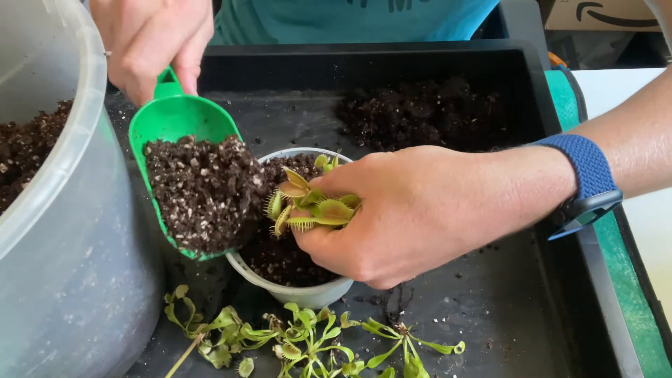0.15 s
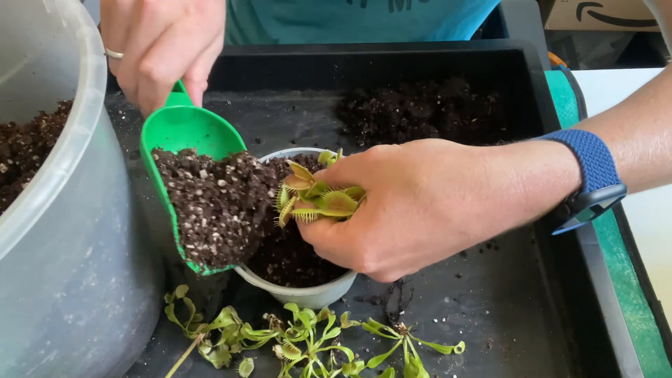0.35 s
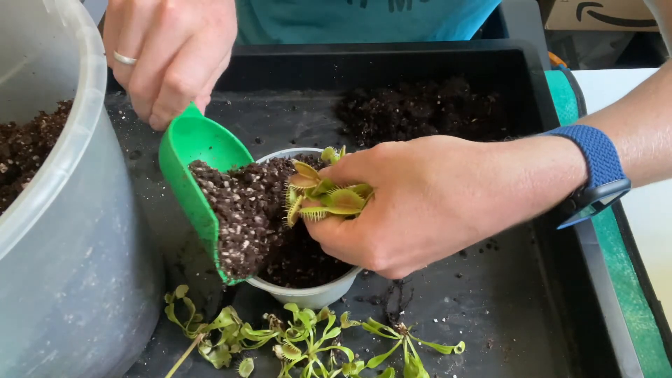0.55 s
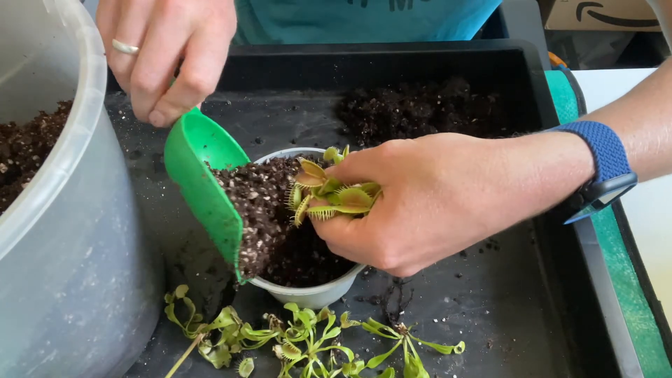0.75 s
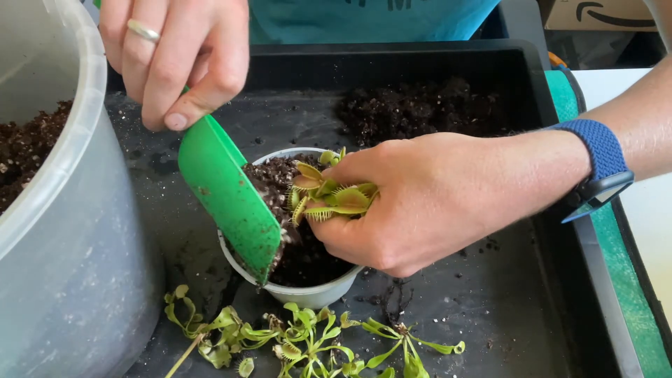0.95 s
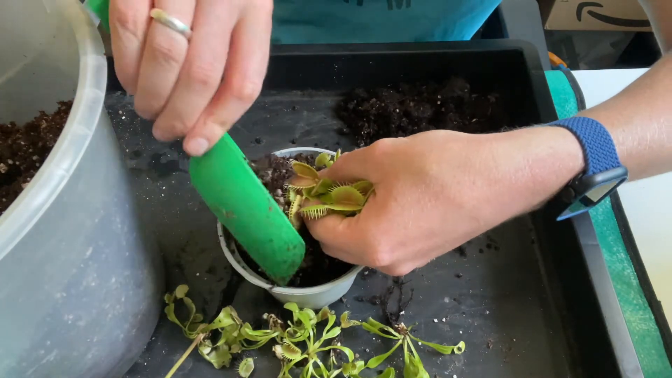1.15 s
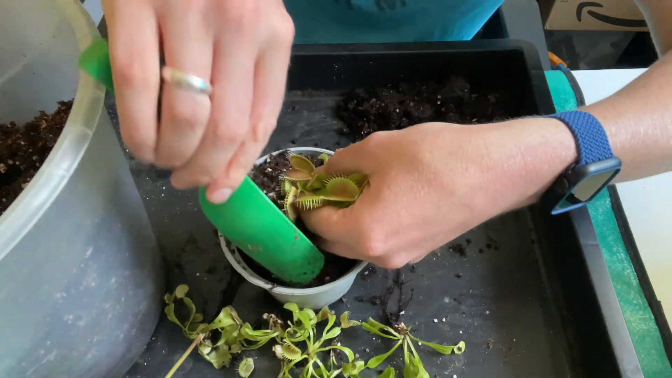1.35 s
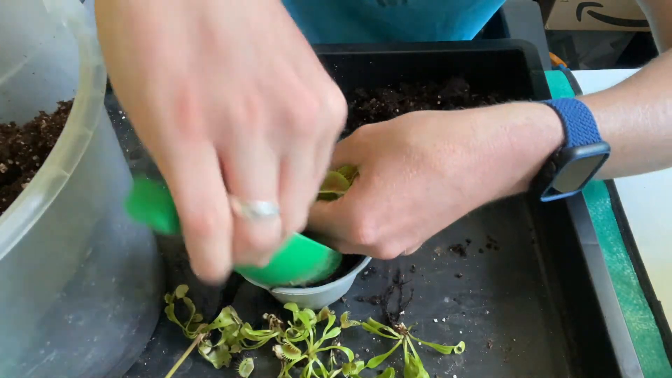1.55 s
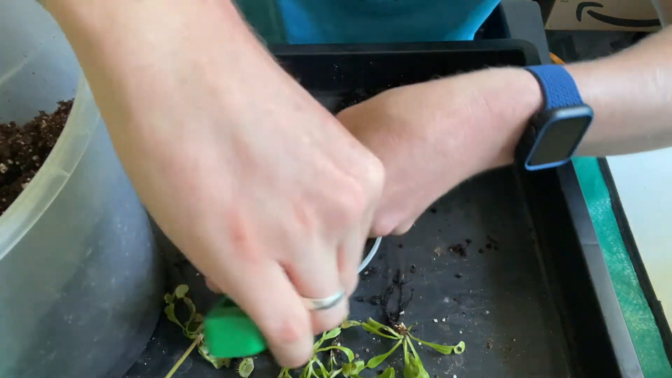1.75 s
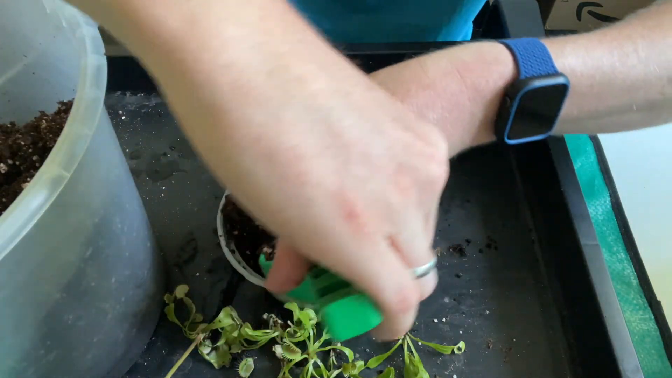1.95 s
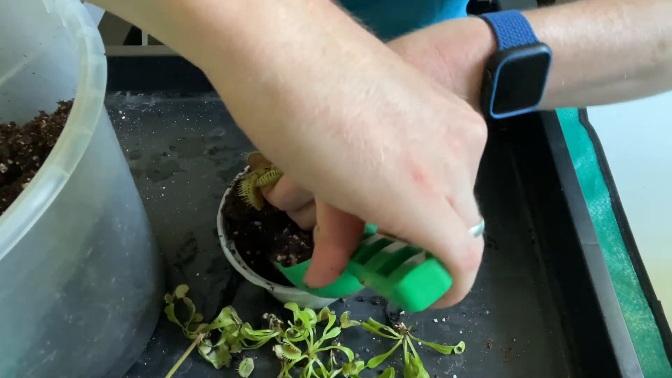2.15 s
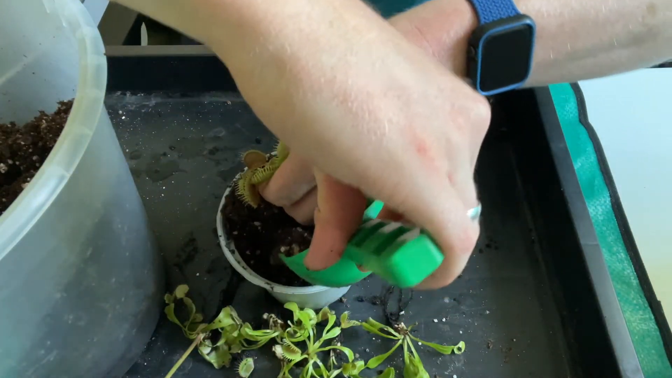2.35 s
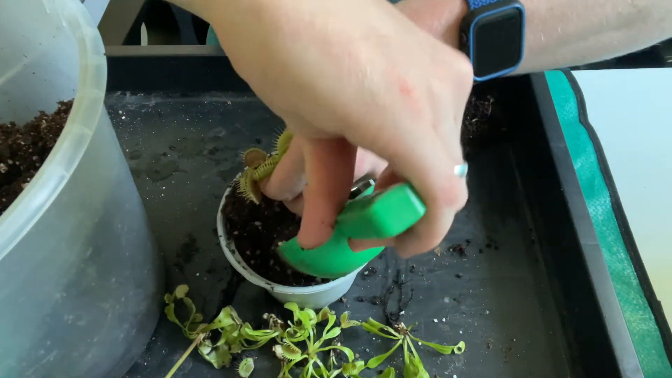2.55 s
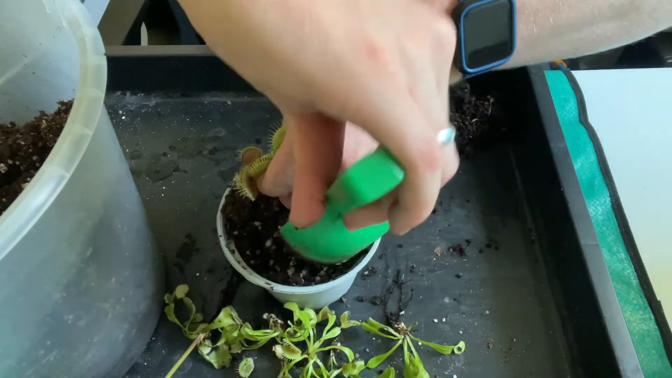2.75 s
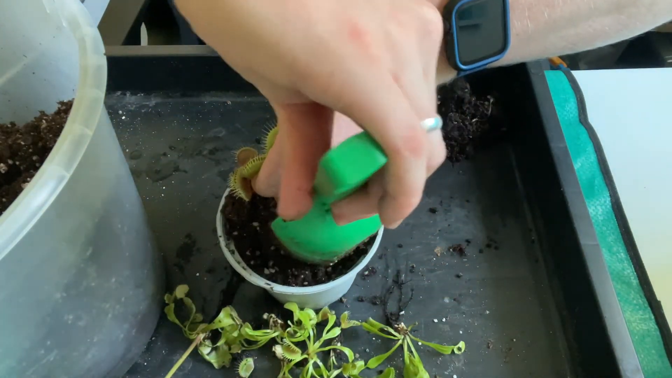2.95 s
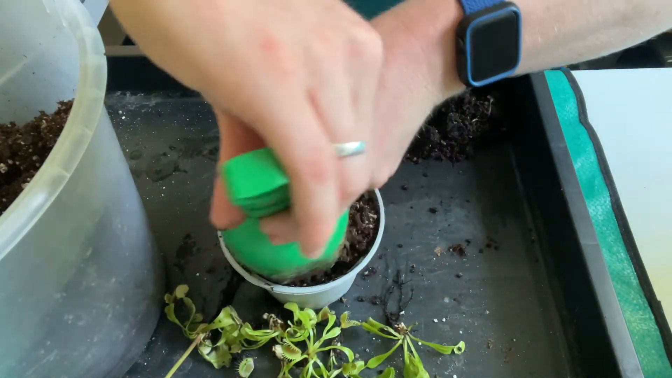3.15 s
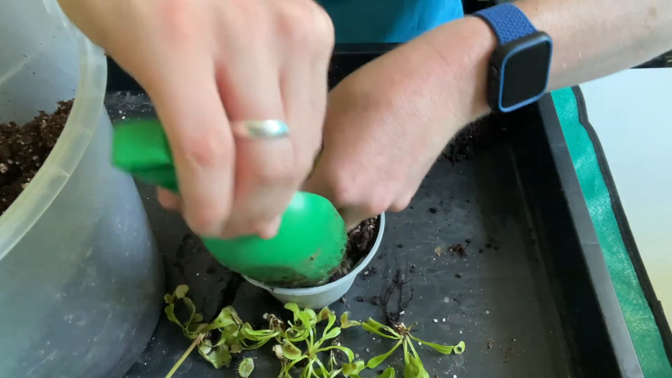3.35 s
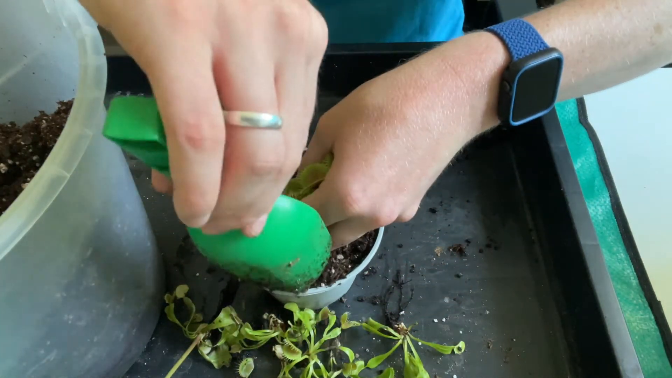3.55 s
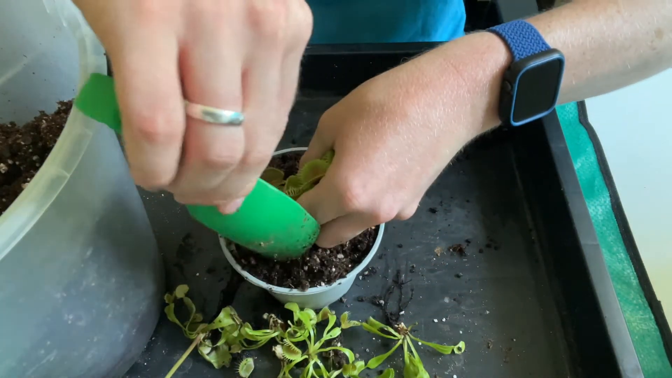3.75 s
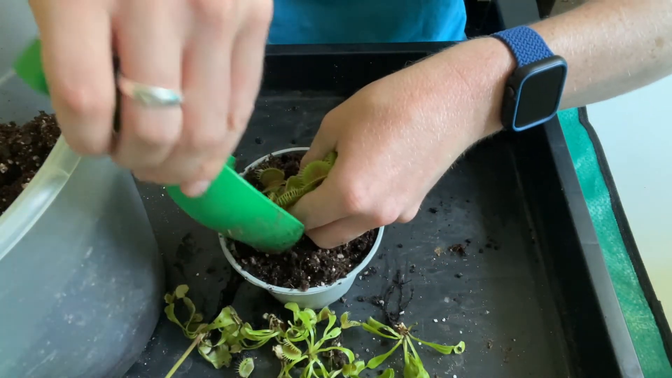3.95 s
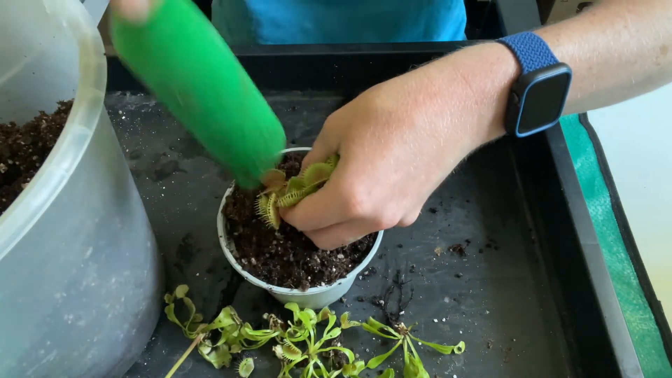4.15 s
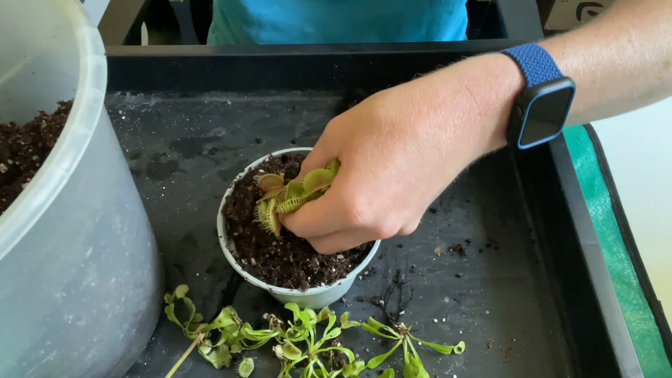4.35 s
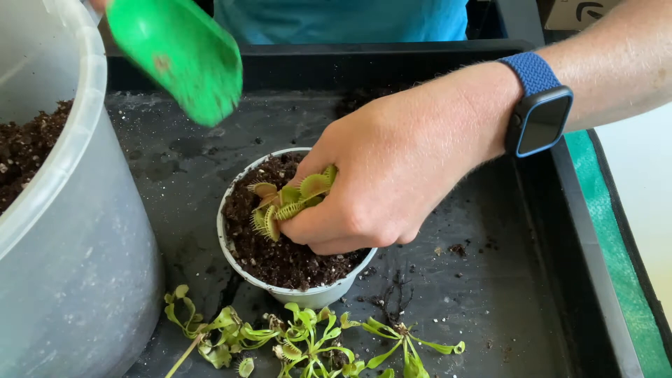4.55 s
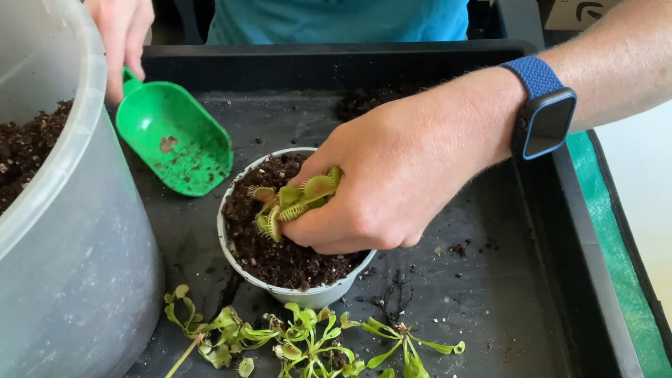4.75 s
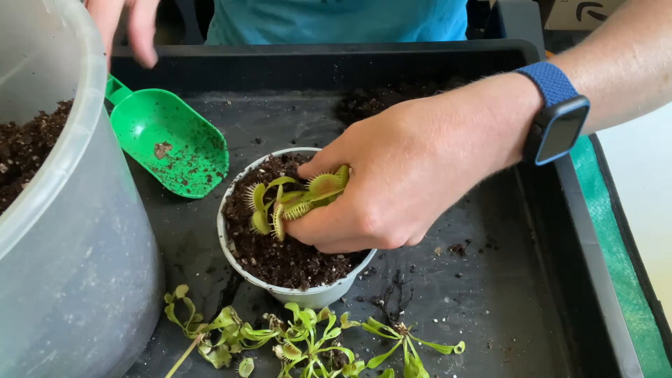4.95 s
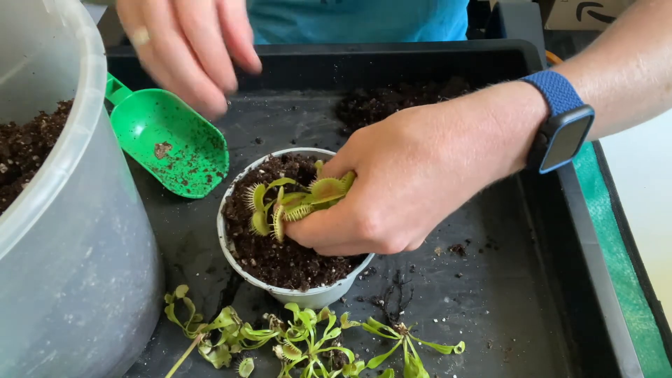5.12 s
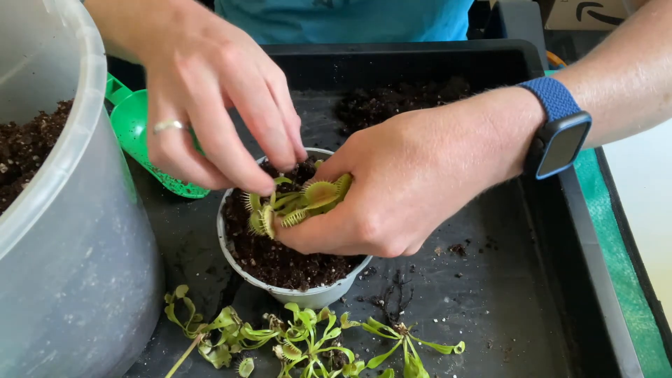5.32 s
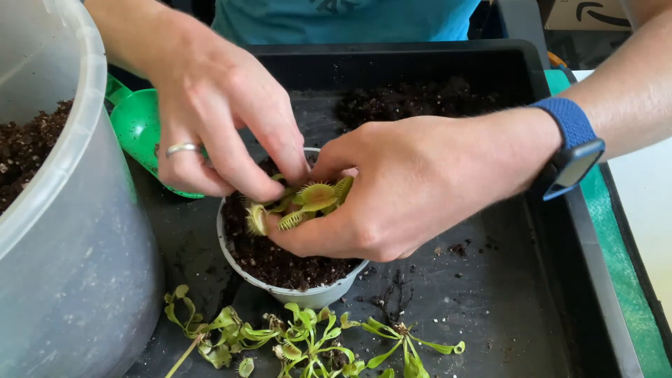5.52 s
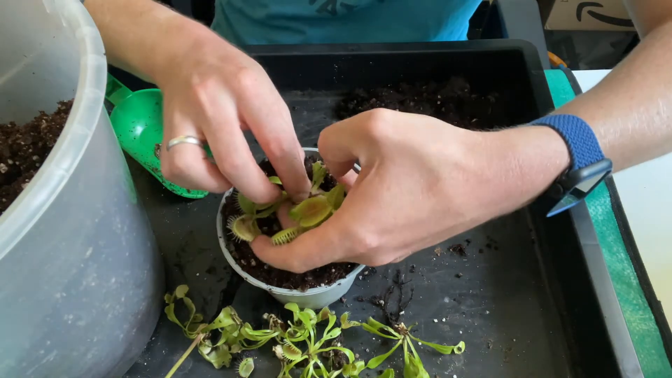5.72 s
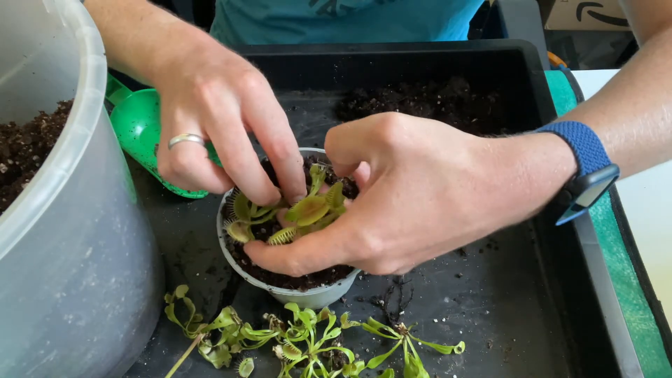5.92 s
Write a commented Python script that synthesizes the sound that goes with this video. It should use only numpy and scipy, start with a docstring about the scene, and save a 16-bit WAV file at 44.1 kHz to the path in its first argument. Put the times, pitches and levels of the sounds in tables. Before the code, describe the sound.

Close, dry hiss and crunch of soil being scooped and pressed, soft table thumps, a short lull, then two hard plastic knocks and faint rustling.

```python
"""Close to a phone, in a quiet room, gritty potting mix slides off a plastic scoop into a small pot.
The grit hisses, then crunches and snaps as the scoop presses it; each shove thumps through the table.
After a lull the scoop drops on a plastic tray, clacks and rocks there, and a few last grains stir.
The hiss and crunches are shaped noise, the thumps are ringing modes, the clacks are both.
The tub, the tray rim and the room answer briefly, over a faint room tone."""
import sys
import numpy as np
from scipy import signal
from scipy.fft import rfft, irfft, next_fast_len
from scipy.io import wavfile
from scipy.ndimage import uniform_filter1d, map_coordinates

SR = 44100
rng = np.random.default_rng(int(sys.argv[2]) if len(sys.argv) > 2 else 0)


def put_to_file(sound):
    """Save the sound as 16-bit audio at rate SR, in the file named by the first command-line argument."""
    columns = np.atleast_2d(sound).T  # one column per channel
    safe = np.clip(columns, -1, 1)
    whole_steps = np.round(safe * 32767)
    wavfile.write(sys.argv[1], SR, whole_steps.astype(np.int16))


N = 263786  # length in samples, about 6 s


def amp(db):
    """Gain of a level in dB."""
    return 10 ** (np.asarray(db) / 20)


def unit(x):
    """x at rms 1."""
    return x / np.sqrt(np.mean(x ** 2) + 1e-20)


def along(points, hz):
    """Values at hz from (f/Hz, value) points joined on a log frequency axis."""
    f, value = np.transpose(points)
    return np.interp(np.log(hz + 1), np.log(f + 1), value)


def filtered(x, response):
    """x times a complex response of frequency."""
    n = x.shape[-1]
    padded = next_fast_len(n + 4096)
    spectrum = rfft(x, padded) * response(np.fft.rfftfreq(padded, 1 / SR))
    return irfft(spectrum, padded)[..., :n]


def resonance(f, hz, width):
    """One causal resonance of peak gain 1, width in Hz."""
    return 1j * f * width / (hz * hz - f * f + 1j * f * width)


def ringing(modes, push, scatter_db):
    """Decaying modes (f/Hz, level/dB, t60/s), levels scattered at random, eased in over push seconds."""
    t = np.arange(SR // 3) / SR
    ring = np.zeros(len(t))
    for hz, db, t60 in modes:
        mode_db = db + scatter_db * rng.standard_normal()
        ring += amp(mode_db - 60 * t / t60) * np.sin(2 * np.pi * hz * t)
    return ring * (1 - np.exp(-t / max(push, 1e-4)))


# Sliding mix: t/s, flow level/dB, dull peat over the flow/dB, fine sand over the flow/dB, table rumble level/dB
SLIDE_COURSE = [(0.0, -50, -8.5, -25, -66), (0.25, -60, 0.5, -7, -51), (0.42, -59.5, -14, -2, -71),
                (0.7, -72.5, -14, -7.5, -63), (0.9, -70.5, 3, -7, -67), (1.06, -73, 0, 10, -43.5),
                (1.2, -66, 1.5, -1.5, -43.5), (1.53, -55.5, 0.5, 1, -53.5),
                (1.75, -55.5, -15.5, -0.5, -58.5), (2.1, -63, 5.5, -6, -58), (2.5, -62, -9, -3.5, -87),
                (3.1, -66, -7.5, 0.5, -64), (3.38, -55, -12.5, -7, -58.5), (3.71, -59, -5.5, 0, -64),
                (3.88, -75, 0.5, -4.5, -80), (4.66, -81, 10.5, -3, -60.5), (4.851, -50, 9.5, -19, -36),
                (5.01, -65, 10.5, -14, -46), (5.209, -76, 20.5, -5.5, -46), (5.48, -73.5, 1.5, -1, -70.5),
                (5.98, -85, 6, 8, -68)]
# Table top modes, also struck in thumps(): f/Hz, level/dB, t60/s
TABLE_MODES = [(89.5, -4, 0.24), (100.46, 2.5, 0.15), (152.9, 0, 0.19), (230, -1, 0.072),
               (321.5, -0.5, 0.08)]


def slide():
    """The mix slides and trickles close by; the same motion rumbles in the table's three lowest modes."""
    t, *courses = np.transpose(SLIDE_COURSE)
    flow_db, peat_db, sand_db, rumble_db = [np.interp(np.arange(N) / SR, t, c) for c in courses]
    dull, grit, sand = grit_stream(spiky_db=4.0, clump_db=3.0)
    hiss = amp(flow_db) * (grit + amp(peat_db) * dull + amp(sand_db) * sand)

    def table(f):
        return sum(amp(db) * resonance(f, hz, 5 / t60) for hz, db, t60 in TABLE_MODES[:3])

    rumble = unit(filtered(rng.standard_normal(N), table))
    return hiss, amp(rumble_db) * rumble


# Resonances of the plastic scoop: f/Hz, width/Hz, level/dB
SCOOP_MODES = [(740, 190, -14), (1560, 600, -16), (2800, 85, -2), (3470, 340, -4), (4644, 400, -4),
               (6480, 170, 1.5), (8060, 770, -12.5)]
# Spectra of dull peat, grit and fine sand, also heard in ticks(): f/Hz, level/dB
PEAT_TONE = [(120, -40.5), (250, -5.5), (600, 0), (1100, -5), (1800, -18.5), (4000, -66.5)]
GRIT_TONE = [(500, -38), (1000, -7), (1500, 3), (3000, 1), (4500, -1.5), (6500, -11.5), (12000, -63)]
SAND_TONE = [(2500, -54), (4300, -6), (5500, -6.5), (8000, -5), (10500, -5.5), (13000, -6.5), (17000, -18)]
MIX_TONES = (PEAT_TONE, GRIT_TONE, SAND_TONE)


def grit_stream(spiky_db, clump_db):
    """Dull, gritty and sandy parts (rms 1) of a dense stream of tiny unequal impacts that come in clumps."""
    clumps = map_coordinates(rng.standard_normal(N // 256 + 4), [np.arange(N) / 256])
    spikes = uniform_filter1d(rng.exponential(size=N) ** 2, size=24)
    shared = amp(clump_db * clumps + spiky_db * spikes)
    impacts = shared * rng.standard_normal((3, N))

    def shell(f):
        return 1.2 + sum(amp(db) * resonance(f, hz, width) for hz, width, db in SCOOP_MODES)

    return [unit(filtered(x, lambda f: shell(f) * amp(along(tone, f))))
            for x, tone in zip(impacts, MIX_TONES)]


def by_size(rule, hz):
    """Level in dB for a grain ringing at hz, from a rule (dB at 3 kHz, dB per octave)."""
    return rule[0] + rule[1] * np.log2(hz / 3000)


# Smaller grains ring higher and carry less dull and more bright sound: dB at 3 kHz, dB per octave
CRUNCH_DULL, CRUNCH_BRIGHT = (-10, -5), (-2, 3.8)
# Crunches and scrapes of grit under the scoop or fingers:
# centre t/s, relative level/dB, ring f/Hz, spread of the swell/s (at least 2 ms is played)
CRUNCH_EVENTS = [(0.037, -49, 3150, 0.023), (0.128, -47.5, 1960, 0.033), (0.2, -55.5, 610, 0.025),
                 (0.29, -57.5, 684, 0.016), (0.809, -49.5, 1554, .009), (0.9135, -52.5, 1770, 0.016),
                 (1.021, -44.5, 1587, 0.02095), (1.106, -42, 1500, 0.016), (1.2309, -35, 2130, 0.014),
                 (1.2875, -47.5, 3560, 0.019), (1.441, -46, 1080, 0.012), (1.493, -44.5, 3330, .017),
                 (1.599, -36.5, 3480, 0.012), (1.8313, -43.5, 3290, 0.014), (1.9016, -42, 850, 0.031),
                 (2.076, -48.5, 8600, 0.0157), (2.122, -46, 1370, 0.019), (2.1727, -44.5, 8200, 0.0097),
                 (2.2957, -51, 3880, .008), (2.388, -44, 6220, 0.0115), (2.4736, -45, 3970, 0.0085),
                 (2.5854, -49, 3660, 0.0058), (2.6308, -51.5, 8200, 0.0066), (2.828, -42, 3050, 0.011),
                 (2.94, -55, 1010, 0.026), (3.014, -51.5, 6200, 0.015), (3.3287, -41.5, 1760, 0.032),
                 (3.479, -30.5, 6760, 0.00492), (3.5424, -49, 910, 0.023), (3.607, -44, 1200, 0.019),
                 (3.7245, -50, 2670, 0.0099), (3.7866, -45.5, 6360, 0.0088), (3.931, -55.5, 1180, 0.015),
                 (4.724, -40.5, 1890, 0.023), (4.75, -32, 2190, 0.0056), (5.121, -42.5, 1340, 0.011),
                 (5.19, -54, 1430, 0.03), (5.338, -56.5, 1600, 0.0036), (5.4075, -61.5, 6718, 0.022),
                 (5.519, -55.5, 6740, 0.0072), (5.682, -68.5, 8000, .015), (5.8728, -67, 7493, 0.011),
                 (5.9345, -59, 1114, 0.021)]


def crunches():
    """A press crushes many grains: the burst swells and fades and rings one resonance of the scoop or pot."""
    out, t = np.zeros(N), np.arange(N) / SR
    dull, grit, sand = grit_stream(spiky_db=2.5, clump_db=1.0)
    for s, db, hz, spread in CRUNCH_EVENTS:
        dull_db, bright_db = by_size(CRUNCH_DULL, hz), by_size(CRUNCH_BRIGHT, hz)
        at = slice(max(round((s - .15) * SR), 0), round((s + .15) * SR))
        swell = np.exp(-.5 * ((t[at] - s) / max(spread, .002)) ** 2)
        ring = unit(filtered(rng.standard_normal(len(swell)), lambda f: resonance(f, hz, 0.16 * hz)))
        ring_db = -2.0 + bright_db * (hz > 5000)  # only high rings follow the grain size
        burst = grit[at] + amp(ring_db) * ring + amp(dull_db) * dull[at] + amp(bright_db) * sand[at]
        out[at] += amp(db - 5) * swell * burst
    return out


# Dull and bright sound by grain size: dB at 3 kHz, dB per octave
TICK_DULL, TICK_BRIGHT = (-9.5, -8.5), (-5, 7.3)
# Single grains that snap or hit the plastic: t/s, relative level/dB, ring f/Hz
TICK_EVENTS = [(0.081, -38.5, 1722), (0.1184, -34.5, 2100), (0.4628, -55, 8600), (0.608, -35.5, 3350),
               (0.9371, -36.5, 4750), (1.1012, -42.5, 1410), (1.1451, -40, 1090), (1.1597, -33.5, 1000),
               (1.2151, -27, 1720), (1.273, -37, 3720), (1.302, -41.5, 4000), (1.421, -33.5, 1510),
               (1.6242, -33.5, 3600), (1.657, -36, 1650), (1.6976, -38.5, 975), (1.815, -35.5, 2840),
               (1.8727, -40, 1490), (1.896, -30.5, 1000), (2.029, -39.5, 3480), (2.1949, -42.5, 7460),
               (2.4027, -35.5, 4350), (2.646, -27.5, 3540), (2.7633, -45.5, 4140), (3.115, -42.5, 2077),
               (3.142, -37, 4000), (3.1903, -36, 4450), (3.2374, -23.5, 3344), (3.312, -29.5, 3330),
               (3.3215, -30, 3330), (3.3443, -37, 7400), (3.391, -41.5, 7890), (3.4007, -37, 4570),
               (3.41, -35, 1660), (3.4488, -38, 2910), (3.4581, -33, 3720), (3.5755, -24.5, 1394),
               (3.5937, -23.5, 2470), (3.6395, -31, 1320), (3.6639, -42.5, 3020), (3.6842, -39, 6210),
               (4.186, -63.5, 8650), (5.3975, -50.5, 6417), (5.44, -57.5, 8420)]


def ticks():
    """One grain: a snap of a millisecond or two with a faint scatter of crumbs after it."""
    out, t = np.zeros(N + SR), np.arange(2048) / SR
    lead = 256  # samples of silence ahead, for the filters
    shape = np.pad(np.exp(-t / .0012) + .12 * np.exp(-t / .01), (lead, 0))
    for s, db, hz in TICK_EVENTS:
        dull_db, bright_db = by_size(TICK_DULL, hz), by_size(TICK_BRIGHT, hz)
        snap = shape * rng.standard_normal(len(shape))
        dull, grit, sand = [unit(filtered(snap, lambda f: amp(along(tone, f)))) for tone in MIX_TONES]
        ring = unit(filtered(snap, lambda f: resonance(f, hz, 0.14 * hz)))
        ring_db = bright_db * (hz > 5000)
        grain = grit + amp(ring_db) * ring + amp(dull_db) * dull + amp(bright_db) * sand
        out[round(s * SR) - lead:][:len(snap)] += amp(db - 21) * grain
    return out[:N]


# Scoop landing and rocking on the tray: t/s, relative level/dB, bright part/dB, scoop note f/Hz
KNOCK_EVENTS = [(4.6658, -25.5, -26, 2522), (4.6831, -19, -21, 1344), (4.7068, -24.5, -9, 600),
                (4.7563, 5, -23.5, 537), (4.776, -21.5, -21.5, 547), (4.8792, -35.5, -10, 800),
                (4.9113, -22, -5, 4800), (5.0367, -38.5, -30, 1420), (5.0558, -26.5, -24, 534),
                (5.1029, -23, -10.5, 1432), (5.1372, -17, -5.5, 1500), (5.1543, -27, -7.5, 1370),
                (5.1698, -24.5, -2.5, 1420), (5.2133, -45.5, 3, 737)]
# Plastic tray modes: f/Hz, level/dB, t60/s
TRAY_MODES = [(334, -8, 0.017), (550, 1.5, 0.017), (744, -13.5, 0.098), (906, -7.5, 0.076),
              (1085, -0.5, 0.022), (1473, -7, 0.074), (1620, 5, 0.02), (1980, 3.5, 0.025), (2456, 0.5, .03),
              (2666, -6.5, .03), (4200, -20.5, 0.02), (4720, -11, .03), (4810, -3.5, 0.039)]


def knocks():
    """The scoop clacks on the tray: a dry crack, the scoop's own note and a short rattle in the tray's modes."""
    out, lead = np.zeros(N + SR), 256  # lead: samples of silence ahead, for the filters
    for s, db, bright_db, hz in KNOCK_EVENTS:
        ring = ringing(TRAY_MODES, push=.0004, scatter_db=2)
        t = np.arange(len(ring)) / SR
        # the light scoop chatters before it rests
        rattle = amp(-60 * t[:1000] / .012) * rng.standard_normal(1000)
        rattle /= np.linalg.norm(rattle)
        ring = amp(-5.5) * signal.fftconvolve(ring, rattle)[:len(t)]
        crack_fade = amp(-60 * t / 0.013) + 0.17 * amp(-60 * t / 0.12)
        crack = 2.18 * crack_fade * rng.standard_normal(len(t))
        note = amp(10.0) * filtered(crack, lambda f: resonance(f, hz, 0.13 * hz))
        # tone of the blow: f/Hz, level/dB
        hardness = [(200, -6), (400, 3), (1000, 3), (1500, 1), (4000, -7),
                    (6000, bright_db), (16000, bright_db - 8.5)]
        blow = filtered(np.pad(ring + crack + note, (lead, 0)), lambda f: amp(along(hardness, f)))
        out[round(s * SR) - lead:][:len(blow)] += amp(db - 6) * blow
    return out[:N]


# Higher table modes: level/dB in a -30 dB thump, and their dB growth per dB of thump (slower than the thump)
UPPER_DB, UPPER_GROWS = -8.5, .75
# Thumps that shake the table: t/s, relative level/dB
THUMP_EVENTS = [(0.479, -32.5), (0.52, -35.5), (0.559, -43), (0.802, -37), (1.059, -36), (1.12, -30),
                (1.168, -29), (1.198, -29), (1.224, -21), (1.271, -42), (1.421, -30.5), (1.623, -40),
                (1.666, -35), (1.696, -41.5), (1.843, -37), (1.914, -34), (2.655, -45.5), (3.194, -35),
                (3.327, -32.5), (3.496, -17.5), (3.541, -32), (4.694, -9.5), (4.714, -16.5), (4.769, -8.5),
                (4.848, -24), (5.068, -16.5), (5.143, -15), (5.225, -30), (5.27, -36.5), (5.359, -38),
                (5.409, -43.5), (5.814, -54.5)]


def thumps():
    """The table top's two lowest modes beat, so a thump holds for a few cycles and then falls away."""
    out = np.zeros(N + SR)
    for s, db in THUMP_EVENTS:
        low = ringing(TABLE_MODES[:2], push=0.0083, scatter_db=2.0)
        upper = ringing(TABLE_MODES[2:], push=0.0079, scatter_db=4.0)
        upper_db = UPPER_DB + (UPPER_GROWS - 1) * (db + 30)
        start = round((s - .004) * SR)  # the push begins 4 ms ahead
        out[start:][:len(low)] += amp(db + 1.0) * (low + amp(upper_db) * upper)
    return out[:N]


# Decay of the room around the table: f/Hz, t60/s
ROOM_DECAY = [(100, 0.39), (600, 0.24), (3000, 0.21), (10000, 0.22)]
# Decay off the tub, tray rim and hands close by: f/Hz, t60/s
NEARBY_DECAY = [(100, 0.064), (2000, .016), (10000, 0.0032)]


def room(x, decay, count):
    """Diffuse answer, unlike at the two ports, redrawn at random count times a second."""
    out, step = np.zeros((2, N + 2 * SR)), SR // count
    for at in range(0, N, step):
        hz, t, z = signal.stft(rng.standard_normal((2, SR // 4)), SR, nperseg=128)
        fade = amp(-60 * t / along(decay, hz)[:, None])
        tail = signal.istft(z * fade, SR, nperseg=128)[1]
        tail /= np.linalg.norm(tail[0])
        wet = signal.fftconvolve(x[None, at:at + step], tail, axes=1)
        out[:, at + 64:][:, :wet.shape[1]] += wet
    return out[:, :N]


# Spectrum of room and microphone noise: f/Hz, level/dB
AIR_TONE = [(25, -14.5), (50, 7), (110, 0), (260, -14.5), (520, -19.5), (1300, -27.5), (4000, -34.5),
            (6000, -38), (8600, -31), (13000, -37.5), (16400, -49)]


def air():
    """Faint room tone: a common and an opposed noise, the opposed one strongest against it near 500 Hz."""
    mid, side = rng.standard_normal((2, N))
    side_over_mid = [(60, -5.5), (500, 5), (4000, -8.0)]  # f/Hz, level/dB
    mid = filtered(mid, lambda f: amp(along(AIR_TONE, f)))
    side = filtered(side, lambda f: amp(along(AIR_TONE, f) + along(side_over_mid, f)))
    return amp(-63.5) * unit(np.array([mid + side, mid - side]))


def scene():
    """Near sounds reach the left port a little early; the table shakes both ports alike."""
    hiss, rumble = slide()
    near = hiss + crunches() + ticks() + knocks()
    near_right = np.pad(near, (3, 0))[:N]  # three samples later
    direct = amp(-0.5) * np.array([near, near_right])
    nearby = amp(-3.5) * room(near, NEARBY_DECAY, count=12)
    answer = amp(-6.5) * room(near, ROOM_DECAY, count=12)
    # little deep bass gets up the stand
    table = filtered(rumble + thumps(), lambda f: (1j * f / (40 + 1j * f)) ** 2)
    boom = amp(-16) * room(table, ROOM_DECAY, count=2)
    return direct + nearby + answer + table + boom + air()


# Treble phase between the phone's ports: f/Hz, phase by which left leads right/rad
PORT_PHASE = [(6000, 2.4), (8600, 0), (10000, -1.2), (11200, -3), (13000, -3.3), (15000, -6.2),
              (16500, -6.4)]


def record(dry):
    """The phone builds its treble from the left port, turned in phase between the sides; loud peaks clip."""
    def treble(f):
        return np.clip((f - 5500) / 2000, 0, 1)

    def turned(f):
        return np.sqrt(treble(f)) * np.exp(.5j * np.outer([1, -1], along(PORT_PHASE, f)))

    low = filtered(dry, lambda f: np.sqrt(1 - treble(f)))
    high = filtered(dry[0], turned)
    both = low + high
    clipped = both / (1 + np.abs(both / .99) ** 10) ** (1 / 10)
    return filtered(clipped, lambda f: f < 16150)  # nothing above 16150 Hz


dry = scene()
out = record(dry)
put_to_file(out)
```